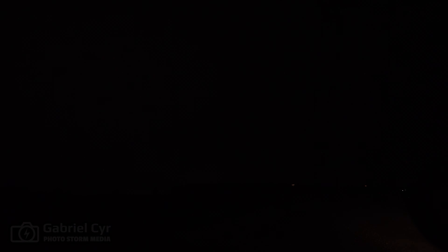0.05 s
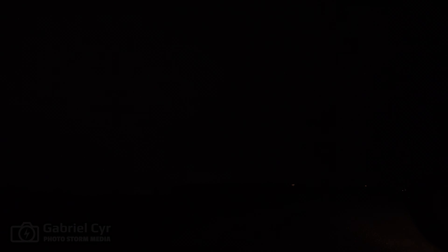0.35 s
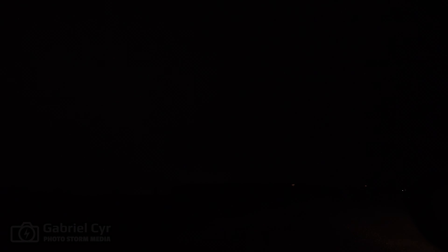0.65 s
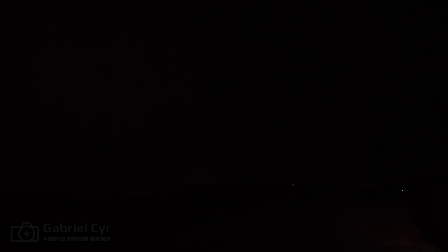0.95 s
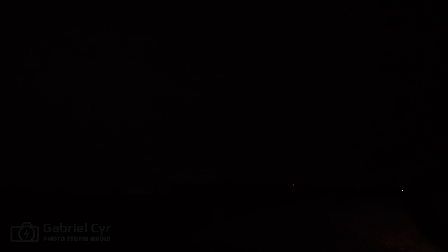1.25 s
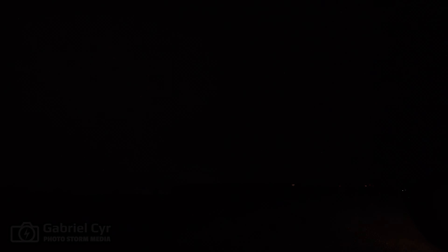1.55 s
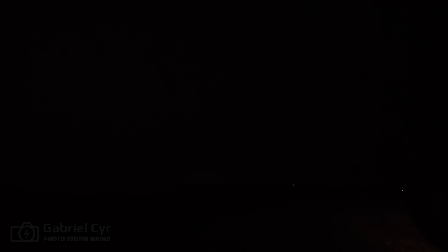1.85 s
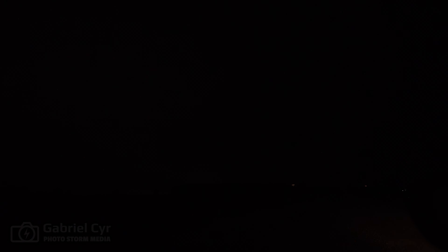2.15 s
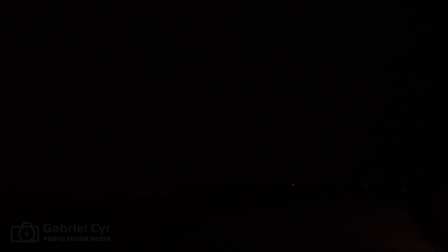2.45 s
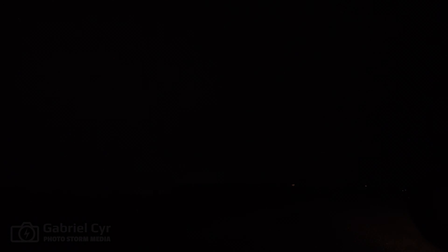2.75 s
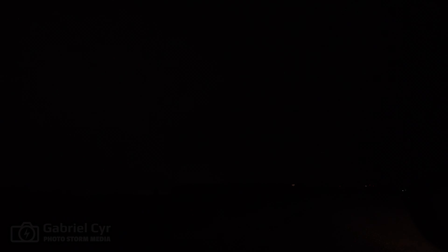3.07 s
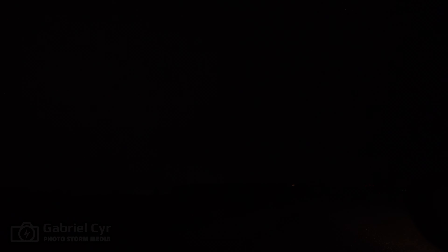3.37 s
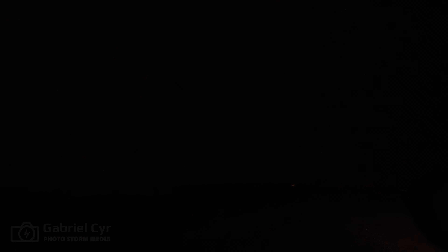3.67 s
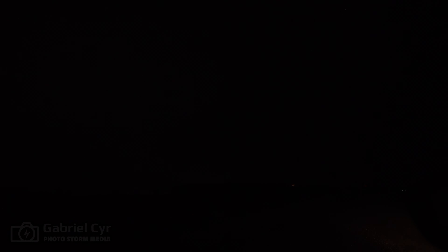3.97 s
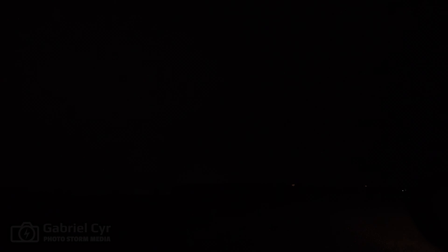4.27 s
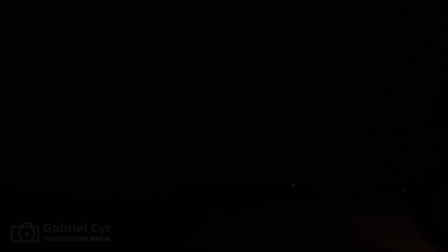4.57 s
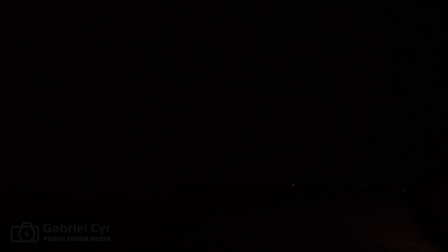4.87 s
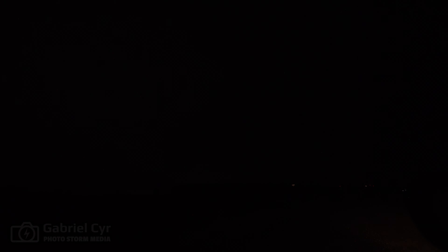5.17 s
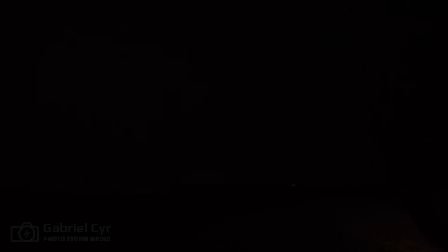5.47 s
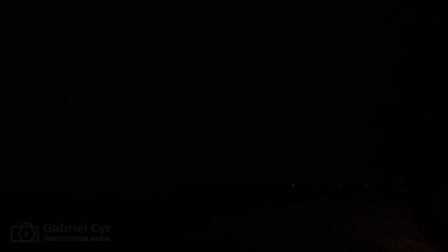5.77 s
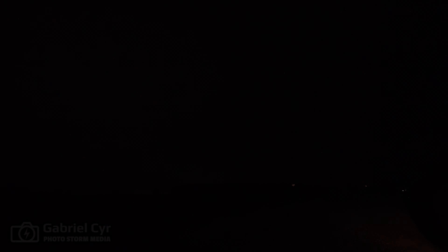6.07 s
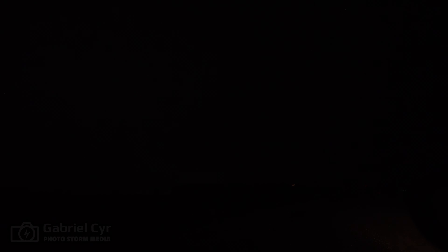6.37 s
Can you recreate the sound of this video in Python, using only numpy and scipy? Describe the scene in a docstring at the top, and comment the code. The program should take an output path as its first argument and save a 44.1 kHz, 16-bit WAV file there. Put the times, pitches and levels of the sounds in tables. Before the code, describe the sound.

Close thunder breaks out at once with a sharp crack and a bright sizzle, like tearing cloth. Hard claps tumble over each other, then the sizzle fades and the thunder rolls on, duller and deeper, with scattered cracks. A strong group of booms swells late before the rumble eases. It is heard outdoors at night, with nearby walls ringing briefly on each clap and a very faint hiss behind.

```python
"""Close thunder at night, heard beside a house: the lightning channel tears and sizzles, then rolls.
Each kink of the channel sends an N-shaped shock; the farther it travels, the duller it sounds.
Nearby walls ring briefly with each clap. Bright sizzle swells as the thunder opens;
a few soft swishes and ticks follow, over faint hiss."""
import sys
import numpy as np
from scipy import signal
from scipy.fft import rfft, irfft, next_fast_len
from scipy.io import wavfile
from scipy.ndimage import map_coordinates

SR = 44100
rng = np.random.default_rng(int(sys.argv[2]) if len(sys.argv) > 2 else 0)


def unload_wav(signal):
    """Save mono or channel-first audio to the path in sys.argv[1] as 16-bit WAV at rate SR, clipped to [-1, 1]."""
    wavfile.write(
        sys.argv[1],
        SR,
        np.round(np.clip(np.atleast_2d(signal).T, -1, 1) * 32767).astype(np.int16),
    )


N = 292383

# Nearest branches. Each row: time in seconds, level in dB.
SIZZLE_LEVELS = [(0, -50.5), (.72, -54.5), (.85, -52), (.94, -46), (1.1, -51.5), (1.25, -52.5), (1.6, -65),
                 (2.5, -66.5), (3, -76.5), (4.9, -78), (6.63, -104)]
# Small shocks between the peals. Each row: time in seconds, level in dB.
ROLL_LEVELS = [(0, -27.5), (.29, -37), (.75, -32.5), (1.15, -29.5), (1.6, -38), (1.85, -33), (2.12, -39.5),
               (2.55, -33.5), (3.05, -37), (3.3, -36.5), (3.55, -40), (3.75, -34.5), (4.4, -37),
               (4.75, -35), (5.3, -38.5), (5.8, -37.5), (6.25, -39.5), (6.63, -41.5)]
# A whole stretch of channel arriving at once.
# Each row: crest time in seconds, roll level in dB, boom level in dB, width in seconds.
PEAL_SWELLS = [(0.159, -33, -34.5, 0.071), (0.518, -28, -35.5, 0.013), (0.962, -30, -49, 0.051),
               (1.201, -32.5, -31.5, 0.033), (1.458, -35, -33.5, 0.054), (2.411, -39.5, -28, 0.021),
               (2.504, -38.5, -31.5, 0.017), (2.64, -38, -36, 0.016), (3.081, -32.5, -47.5, 0.015),
               (3.135, -37.5, -37.5, .018), (3.78, -34, -44.5, 0.02), (3.9, -33.5, -31, 0.025),
               (4.62, -32, -31, 0.052), (4.87, -36, -38, 0.073), (5.086, -25.5, -26.5, .016),
               (5.16, -26.5, -26.5, 0.022), (5.477, -29.5, -27, .025), (5.663, -28.5, -30.5, 0.034),
               (6.029, -35.5, -39.5, 0.044)]
# Bright sizzle as the thunder opens, then soft swishes.
# Each row: crest time in seconds, gain in dB, width in seconds.
BRIGHT_SWELLS = [(.04, -60, 0.12), (0.601, -53.5, 0.011), (1.238, -56, .018), (1.951, -71.5, 0.024),
                 (2.49, -68, 0.019), (3.416, -77, 0.014), (4.02, -82, 0.045), (4.694, -61.5, .018)]
# Loudest shocks. Each row: start in seconds, gain in dB, N-wave length in ms, air loss in dB per kHz.
CLAP_EVENTS = [ (.059, -14.5, 2.3, 7.5), (0.099, -15.5, 1.8, 2.5), (.114, -15.5, 2.9, 8.5),
               (0.169, -12, 3.5, 13), (.198, -17, 3.9, 10.5), (.333, -13.5, 2.3, 8), (0.388, -13, 2.8, 5),
               (.502, -17.5, 4.4, 3.5), (0.661, -21, 1.28, 4), (.894, -18, 2.6, 4.5), (.928, -6, 2.5, 10.5),
               (.964, -14.5, 3.4, 4.5), (1.038, -18, 1.8, 5), (1.162, -13, 2.9, 8.5),
               (1.1803, -10.5, 6, 10.5), (1.187, -10.5, 2.9, 2.5), (1.202, -16.5, 2.6, 11.5),
               (1.4, -16.5, 3.7, 9), (1.433, -12, 5.8, 11), (1.466, -11.5, 3.6, 15.5),
               (1.505, -18, 2.9, 16.5), (1.699, -11.5, 4.5, 7.5), (1.768, -12.5, 3.8, 2.5),
               (1.904, -12.5, 2.8, 5.5), (1.96, -12, 3.2, 13), (1.992, -17.5, 3.8, 10.5),
               (2.381, -13, 2.7, 7), (2.397, -9, 3.8, 4), (2.4812, -14.5, 5.5, 4.8), (2.5377, -17, 3.3, 7),
               (2.62, -11.5, 4.6, 14.5), (2.78, -16, 2.7, 12.5), (2.878, -16.5, 2.9, 6.5),
               (3.101, -13, 3.7, 7.5), (3.446, -19, 5.2, 8), (3.794, -15, 3.3, 12), (3.83, -17, 3.9, 14),
               (3.873, -16.5, 7, 16.5), (3.893, -13.5, 3.6, 6.5), (3.934, -13, 4.4, 9),
               (4.112, -20, 3, 7.5), (4.513, -17.5, 3.9, 7), (4.56, -15, 3.6, 15.5), (4.624, -13, 2.6, 9),
               (4.659, -13, 3.7, 4), (4.68, -12.5, 9, 15), (4.837, -16.5, 2.4, 8), (4.858, -15, 3.6, 13),
               (5.054, -17.5, 6.3, 7), (5.078, -9, 7, 6), (5.141, -11, 5.8, 6.5), (5.496, -18, 6.6, 10),
               (5.636, -12, 2.2, 7.5), (5.659, -14, 6.2, 8), (5.68, -12.5, 2.9, 9), (6.04, -20, 6.7, 7.5),
               (6.348, -14.5, 2.5, 11.5), (6.43, -15.5, 2.37, 15.5)]
# Small ticks. Each row: start in seconds, gain in dB.
TICK_EVENTS = [(1.725, -65), (5.823, -60)]
# Wall and microphone resonances and notches. Each row: centre in Hz, width in Hz, gain in dB.
RESONANCES = [(95, 30, 9.5), (179, 27, 2), (217, 32, -2.5), (261.4, 33, 4.5), (305, 36.8, 7), (335, 68, -2),
              (394, 56, 2.5), (591, 33, 7), (1056, 370, 8), (1312, 96, 4.5), (1863, 290, 5.5),
              (2410, 330, -3.5), (2860, 180, 4.5)]
# Spectra. Each row: frequency in Hz, relative density in dB.
SIZZLE_SPECTRUM = [(700, -37), (1600, 9.5), (2400, 4), (2800, 2.5), (3300, 0), (4800, -3.5), (6300, -15),
                   (8000, -23), (10000, -36.5), (12500, -45.5)]
BRIGHT_SPECTRUM = [(1500, -41), (3300, 7), (4800, 5.5), (7000, -5.5), (9500, -16), (12500, -26)]
HISS_SPECTRUM = [(100, 8), (2000, 5), (5000, 5), (8000, 1.5), (12500, -1)]
# Stereo width of the reflections. Each row: frequency in Hz, side gain in dB.
SIDE_GAINS = [(30, -12.5), (70, -18.5), (300, -17.5), (600, -16.5), (1100, -15), (1800, -8.5), (6000, -6.5)]
# Thunder balance. Each row: frequency in Hz, left minus right in dB.
BALANCE = [(30, -2), (70, 1.5), (130, 3.5), (250, 1.55), (500, 1), (1000, -1), (2000, 0.5), (4000, -2.5),
           (9000, -4.5)]


def amp(db):
    """Decibels to gain."""
    return 10 ** (np.asarray(db) / 20)


def unit_rms(x):
    """Scale to rms 1."""
    return x / np.sqrt(np.mean(x ** 2) + 1e-20)


def db_at(table, hz):
    """Interpolate (Hz, dB) rows on a log axis."""
    knots_hz, db = np.transpose(table)
    return np.interp(np.log(hz + 1), np.log(knots_hz + 1), db)


def envelope_db(table):
    """Interpolate (seconds, dB) rows per sample."""
    return np.interp(np.arange(N) / SR, *np.transpose(table))


def filtered(x, response):
    """Apply a complex frequency response."""
    size = x.shape[-1]
    padded = next_fast_len(size + SR // 4)
    return irfft(rfft(x, padded) * response(np.fft.rfftfreq(padded, 1 / SR)), padded)[..., :size]


def shaped(x, spectrum):
    """Filter by (Hz, dB) rows."""
    return filtered(x, lambda hz: amp(db_at(spectrum, hz)))


def noise(spectrum):
    """Uncorrelated stereo noise, rms 1."""
    return unit_rms(shaped(rng.standard_normal((2, N)), spectrum))


def add(track, start_s, sound):
    """Mix in place from start_s."""
    start = max(round(start_s * SR), 0)
    part = sound[:max(len(track) - start, 0)]
    track[start:start + len(part)] += part


def bell(hz, centre_hz, width_hz, gain_db):
    """Causal response of one resonance or notch."""
    damping = 1j * hz * width_hz
    return 1 + (amp(gain_db) - 1) * damping / (centre_hz ** 2 - hz ** 2 + damping)


def n_waves(starts_s, peaks, lengths_ms, size):
    """Shocks: pressure jumps up, falls linearly to as far below rest, and jumps back."""
    def impulses(at, weights):
        return np.bincount(at, weights, size)[:size]
    start = np.round(starts_s * SR).astype(int)
    span = np.maximum(np.round(lengths_ms * SR / 1000), 2).astype(int)
    fall = 2 * peaks / span
    slope = np.cumsum(impulses(start + span + 1, fall) - impulses(start + 1, fall))
    return np.cumsum(impulses(start, peaks) + impulses(start + span, peaks) + slope)


def swarm(per_s, length_ms, length_spread, spread_db):
    """Shocks from countless kinks, random in time, strength and length."""
    draws = rng.random((int(per_s * N / SR), 3))
    strength, stretch = np.log(draws[:, 1:] / (1 - draws[:, 1:])).clip(-4, 4).T / 2  # logistic
    lengths_ms = length_ms * np.exp(length_spread * stretch)
    return n_waves(draws[:, 0] * N / SR, amp(spread_db * strength), lengths_ms, N)


def sizzle():
    """Fine side branches crackle densely, like tearing cloth."""
    shocks = swarm(per_s=4500, length_ms=0.55, length_spread=0.6, spread_db=2.5)
    fronts = np.diff(shocks, prepend=0)
    crackle = unit_rms(shaped(fronts, SIZZLE_SPECTRUM))
    return amp(envelope_db(SIZZLE_LEVELS)) * (crackle + 0.11 * noise(SIZZLE_SPECTRUM))


def air(x, db_per_khz, knee_hz=3300):
    """Air absorption, steeper above the knee, rounds the shock fronts."""
    size = 2048
    hz = np.fft.rfftfreq(size, 1 / SR)
    loss_db = db_per_khz * hz / 1000 * (1 + (hz / knee_hz) ** 2 / 2)
    cepstrum = irfft(np.log(amp(-loss_db) + 1e-6))
    cepstrum[1:size // 2] *= 2  # fold to minimum phase
    cepstrum[size // 2 + 1:] = 0
    return signal.oaconvolve(x, irfft(np.exp(rfft(cepstrum))))[:len(x)]


def walls(x, echo_s=0.004105, echo_db=-9, echo_top_hz=600, low_cut_hz=33):
    """A near wall rings and returns a dull echo; the deepest bass is cut."""
    def response(hz):
        ringing = np.prod([bell(hz, *row) for row in RESONANCES], axis=0)
        echo = amp(echo_db) * np.exp(-2j * np.pi * hz * echo_s) / (1 + (hz / echo_top_hz) ** 2)
        low_cut = (1j * hz / (low_cut_hz + 1j * hz)) ** 2
        return ringing * (1 + echo) * low_cut
    return filtered(x, response)


def peals_db(boom_offset_db=-13, boom_db_per_s=1.44):
    """Roll and boom levels: Gaussian peals over a rumble that deepens with distance."""
    t = np.arange(N) / SR
    base_db = envelope_db(ROLL_LEVELS)
    power = amp([base_db, base_db + boom_offset_db + boom_db_per_s * t]) ** 2
    for crest_s, roll_db, boom_db, width_s in PEAL_SWELLS:
        during = abs(t - crest_s) < 5 * width_s
        swell = np.exp(-0.5 * ((t[during] - crest_s) / width_s) ** 2)
        power[:, during] += np.outer(amp([roll_db, boom_db]) ** 2, swell)
    return 10 * np.log10(power)


def clumping(knots_per_s):
    """Shocks arrive in clumps: a random piecewise-linear curve."""
    knots = rng.standard_normal(int(N * knots_per_s / SR) + 4)
    return map_coordinates(knots, [np.arange(N) * knots_per_s / SR], order=1)


def rolling(far_start_s=1.2, crossfade_s=3.01, clump_db=1.7):
    """Short shocks roll, long ones boom; they come from ever farther up the channel."""
    near = swarm(per_s=1600, length_ms=1.563, length_spread=0.55, spread_db=3.5)
    near = unit_rms(walls(air(near, db_per_khz=4)))
    far = swarm(per_s=1200, length_ms=1.452, length_spread=0.5, spread_db=1.5)
    far = unit_rms(walls(air(far, db_per_khz=7.5, knee_hz=2600)))
    boom = swarm(per_s=120, length_ms=9, length_spread=0.55, spread_db=2)
    boom = unit_rms(walls(air(boom, db_per_khz=52.5)))
    far_share = np.clip((np.arange(N) / SR - far_start_s) / crossfade_s, 0, 1)
    roll = np.sqrt(1 - far_share) * near + np.sqrt(far_share) * far
    roll_db, boom_db = peals_db()
    return amp(roll_db + clump_db * clumping(knots_per_s=26)) * roll + amp(boom_db) * boom


def reflections(x, t60_s=0.026):
    """Reflections differ per side: a short scatter, added left and subtracted right."""
    t = np.arange(SR // 8) / SR
    scatter = rng.standard_normal(len(t)) * t * amp(-60 * t / t60_s)
    side = signal.oaconvolve(x, scatter / np.linalg.norm(scatter))[:N]
    side = shaped(side, SIDE_GAINS)
    return np.array([x + side, x - side])


def bright_swell_envelope():
    """Bright sizzle as the thunder opens, then soft swishes; each swells and fades."""
    t = np.arange(N) / SR
    return sum(amp(db) / np.cosh(np.clip((t - crest_s) / width_s, -20, 20) * np.sqrt(2))
               for crest_s, db, width_s in BRIGHT_SWELLS)


def clap(length_ms, db_per_khz, lag_s=0.009, trail_db=-12, fade_db_per_s=150, spread_db=2, count=7):
    """One loud shock, trailed by weaker, duller ones from the neighbouring stretch of channel."""
    size = SR // 12
    front = n_waves(np.zeros(1), np.ones(1), np.array([length_ms]), size)
    delays_s = length_ms / 1000 + rng.exponential(lag_s, count)
    peaks = amp(trail_db - fade_db_per_s * delays_s + spread_db * rng.standard_normal(count))
    lengths_ms = length_ms * np.exp(0.4 * rng.standard_normal(count))
    trail = n_waves(delays_s, peaks, lengths_ms, size)
    return air(front, db_per_khz) + air(trail, db_per_khz + 1)


def lesser_claps(over_roll_db=12, spread_db=1.3, length_ms=2.7, count=80):
    """Lesser claps tumble unevenly through the roll, duller with time."""
    track = np.zeros(N)
    roll_db = envelope_db(ROLL_LEVELS)
    starts_s = (np.arange(count) + rng.random(count)) / count * (N - 1) / SR
    for start_s, (strength, stretch) in zip(starts_s, rng.standard_normal((count, 2))):
        db = roll_db[int(start_s * SR)] + over_roll_db + spread_db * strength
        shock = clap(length_ms * np.exp(0.22 * stretch), db_per_khz=9 + 0.8 * start_s)
        add(track, start_s, amp(db) * shock)
    return walls(track)


def main_claps():
    """Each big kink is one clap. Strong shocks steepen in transit, regaining some bite."""
    track = np.zeros(N)
    for start_s, db, length_ms, db_per_khz in CLAP_EVENTS:
        add(track, start_s, amp(db) * clap(length_ms, db_per_khz))
    steepened = filtered(track, lambda hz: bell(hz, centre_hz=3400, width_hz=1500, gain_db=5))
    return walls(steepened)


def tick_envelope(t60_s=0.014):
    """Ticks start at once and decay fast."""
    envelope = np.zeros(N)
    t = np.arange(SR // 10) / SR
    for start_s, db in TICK_EVENTS:
        add(envelope, start_s, amp(db - 60 * t / t60_s))
    return envelope


def scene():
    """Thunder, lows leaning left and treble right, plus bright swells, ticks and hiss."""
    thunder = reflections(main_claps()) + reflections(rolling() + lesser_claps()) + sizzle()
    thunder = filtered(thunder, lambda hz: amp(np.outer([0.5, -0.5], db_at(BALANCE, hz))))
    centre_noise = noise(BRIGHT_SPECTRUM)[0]
    wide_noise = 0.87 * noise(BRIGHT_SPECTRUM)
    bright_sounds = (bright_swell_envelope() + tick_envelope()) * (centre_noise + wide_noise)
    return thunder + bright_sounds + amp(-80) * noise(HISS_SPECTRUM)


def record(dry, top_hz=12750):
    """Brick-wall low-pass."""
    return filtered(dry, lambda hz: hz < top_hz)


dry = scene()
out = record(dry)
unload_wav(out)
```